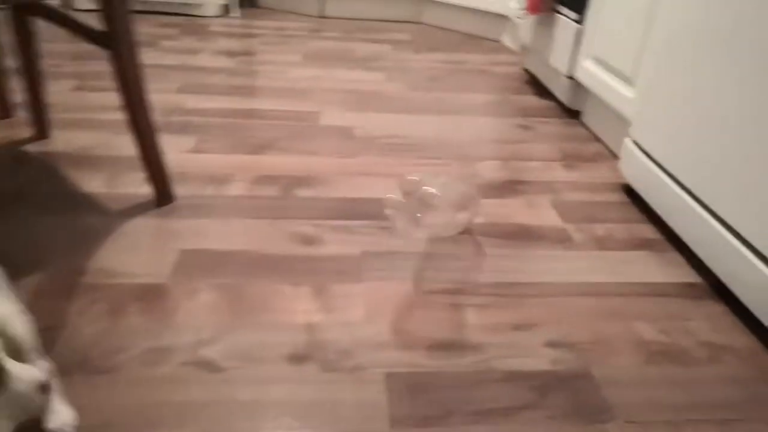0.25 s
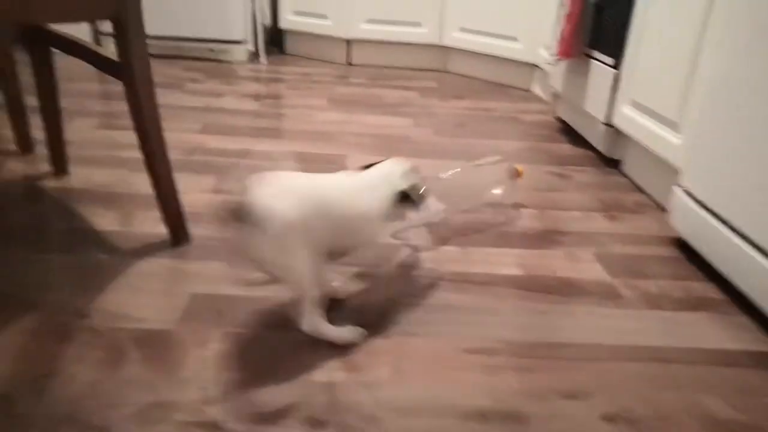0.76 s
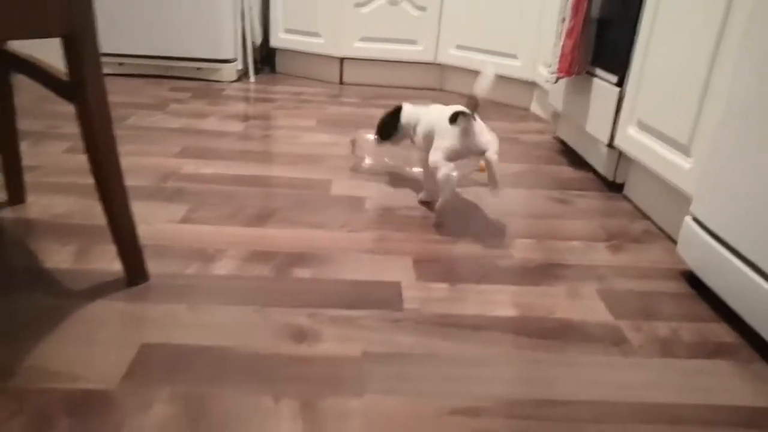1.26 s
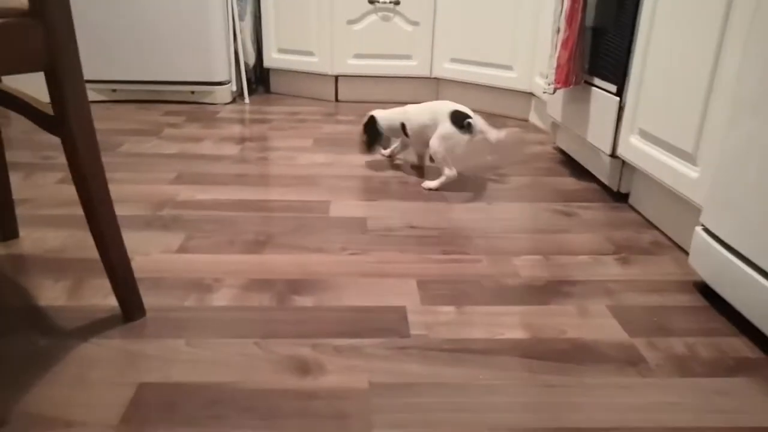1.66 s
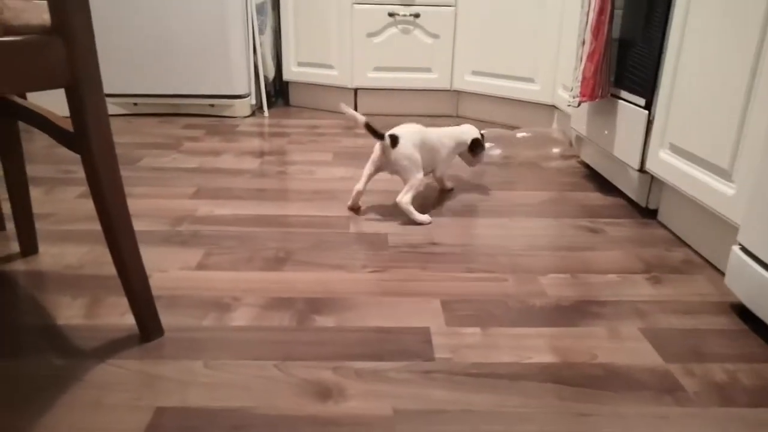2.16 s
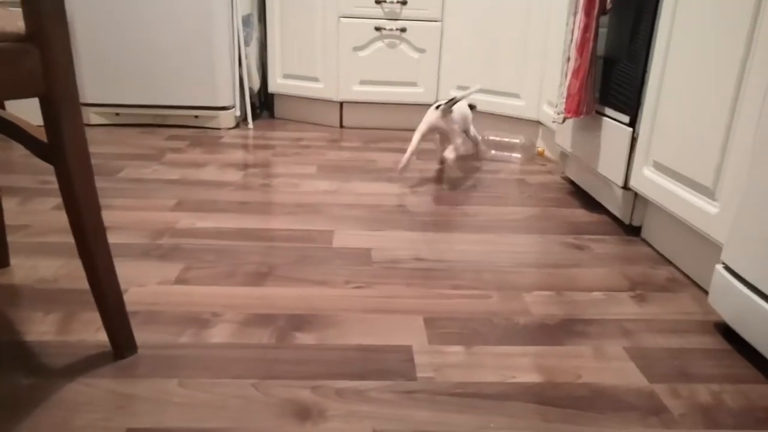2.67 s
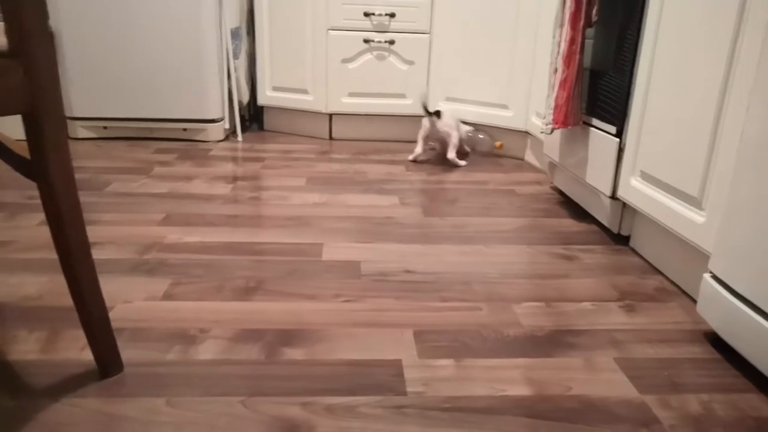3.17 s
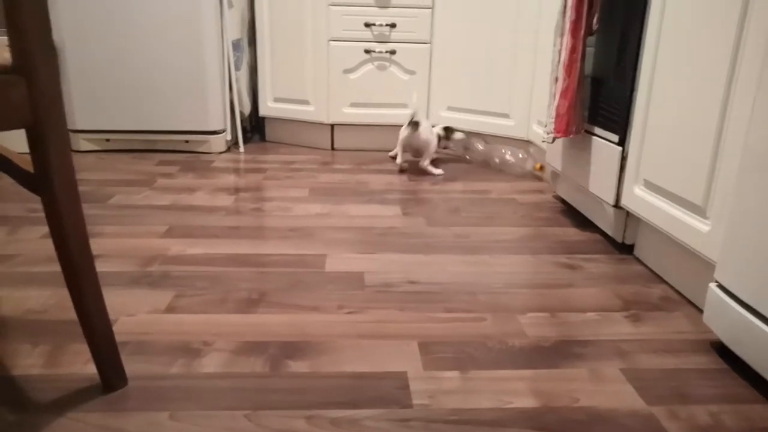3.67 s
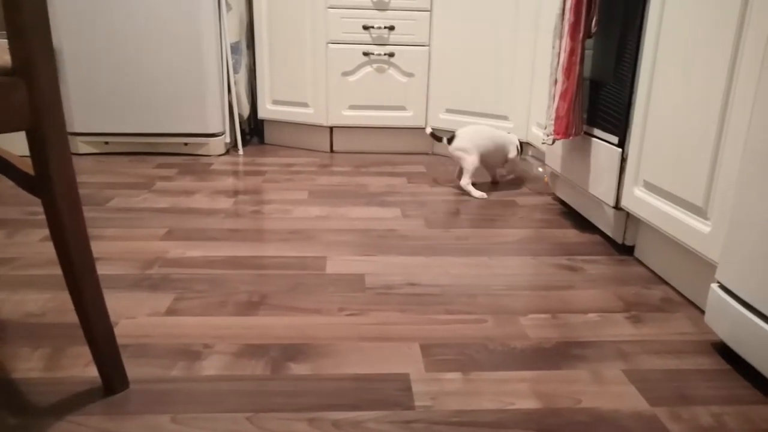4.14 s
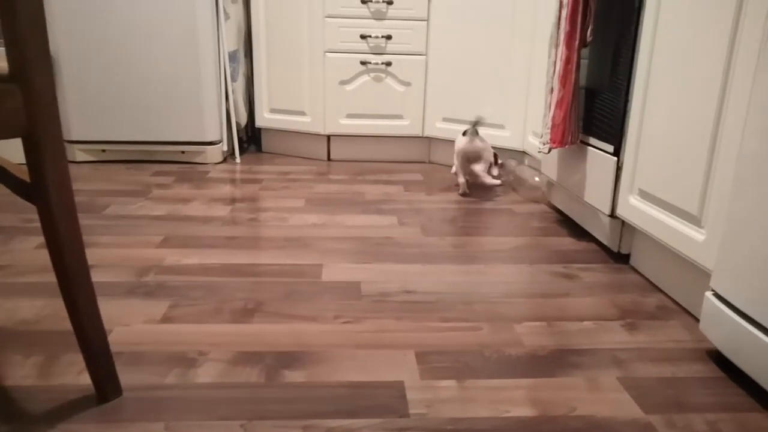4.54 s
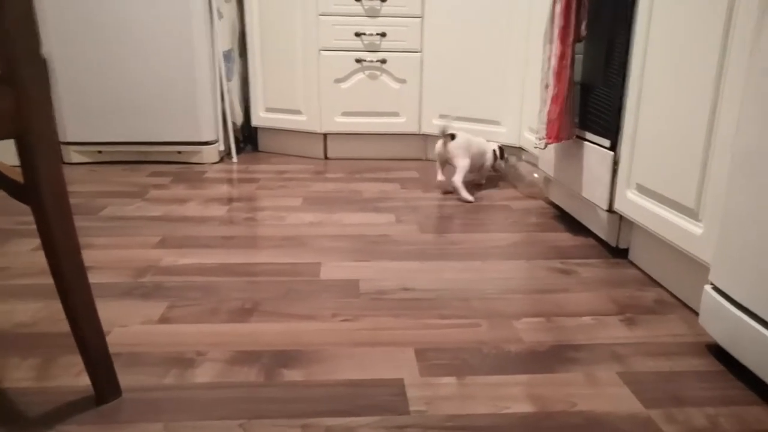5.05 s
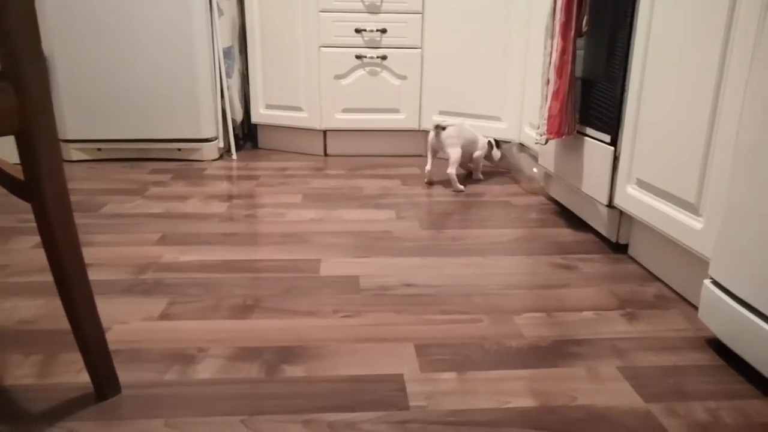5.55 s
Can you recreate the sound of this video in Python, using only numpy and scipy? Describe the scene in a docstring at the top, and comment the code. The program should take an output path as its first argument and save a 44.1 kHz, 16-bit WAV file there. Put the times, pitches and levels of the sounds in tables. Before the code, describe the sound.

Uneven crunches and snaps of a thin plastic bottle, with floor thuds and faint claw ticks as a puppy plays in an echoing kitchen.

```python
"""A puppy and a plastic bottle

A puppy bites and shoves an empty plastic bottle across the laminate floor of a bare, echoing kitchen.
Each knock or bite sets off a short run of snaps as the thin wall buckles; some leave a note ringing.
Paws and bottle thump the floorboards, and claws tick lightly on them.
The echo grows as the game moves off towards the cupboards and shrinks when it comes closer."""
import sys
import numpy as np
from scipy import signal
from scipy.fft import rfft, irfft, next_fast_len
from scipy.io import wavfile

SR = 44100
rng = np.random.default_rng(int(sys.argv[2]) if len(sys.argv) > 2 else 0)


def put_to_file(sound):
    """Save the sound as 16-bit audio at rate SR, in the file named by the first command-line argument."""
    columns = np.atleast_2d(sound).T  # one column per channel
    safe = np.clip(columns, -1, 1)
    whole_steps = np.round(safe * 32767)
    wavfile.write(sys.argv[1], SR, whole_steps.astype(np.int16))


N = 256212
TIME = np.arange(N) / SR

# tone of the room's faint background noise: (frequency [Hz], relative level [dB])
HUSH_TONE = [(30, -28), (70, -3.5), (200, -10), (400, -13.5), (800, -20.5), (2100, -21.5), (4000, -32),
             (8000, -26), (15000, -29)]
# paws and bottle landing hard on the floor: (time [s], board level [dB], deep thud level [dB])
THUMPS = [(.071, -18.5, -34), (.335, -22, -35), (.419, -20, -27.5), (.753, -23.5, -57), (.903, -24.5, -26),
          (1.072, -26.5, -25.5), (1.121, -27, -24), (1.212, -23, -27.5), (1.425, -18.5, -31),
          (2.172, -32, -34.5), (2.404, -40.5, -33), (2.503, -26, -49), (2.813, -20, -38),
          (2.911, -16.5, -23.5), (2.986, -19, -20.5), (3.129, -18.5, -20.5), (3.364, -21.5, -30.5),
          (3.48, -25, -32.5), (3.725, -18.5, -50), (3.885, -18, -25.5), (4.022, -15, -23),
          (4.375, -51, -27), (4.428, -16.5, -20.5), (4.672, -24, -25), (5.052, -31.5, -25.5),
          (5.167, -36, -32.5), (5.374, -46, -35.5), (5.495, -27, -30.5), (5.527, -17.5, -22)]
# how busily the puppy worries the bottle between knocks: (time [s], strength [dB])
FUSS = [(.06, -90), (.27, -29), (.7, -39.5), (1.05, -26), (1.62, -32.5), (1.95, -49.5), (2.09, -49.5),
        (2.16, -31), (2.53, -35), (2.65, -51.5), (3.15, -34.5), (3.3, -43.5), (3.62, -39), (3.92, -28.5),
        (4.3, -48.5), (4.62, -34.5), (4.85, -67), (5.68, -37)]
# A mode is a note that an object rings at when struck.
# hollow notes of the boards: (base pitch [Hz], width [Hz], relative level [dB])
BOARD_MODES = [(239.6, 29, 2), (320, 17.3, 0.5), (359.3, 32.6, 0), (527, 36, -6.5)]
# deep thud of the floor: (pitch [Hz], width [Hz], relative level [dB])
THUD_MODES = [(75, 18, -4), (115, 19.5, -7), (160, 31, 2)]
# the boards sound lower towards the cupboards: (time [s], pitch [ratio])
BOARD_PITCH = [(0, 1.054), (2.9, 1), (4.1, 0.967), (5.5, 0.97)]

# knocks and bites; sharpness below 0 is a blunt bump, above 0 a crease snapping:
# (time [s], strength [dB], sharpness [dB], buckling time [s])
KNOCKS = [(.073, -13.5, 4.5, 0.0019), (0.0941, -12, 9.5, .0004), (.337, -9.5, -10, .0004),
          (.419, -16, 8.5, 0.0049), (.465, -27, 5.5, 0.064), (0.752, -12, 9.5, 0.0084),
          (.906, -22.5, 2.5, 0.0051), (.928, -14, -2.5, .002), (1.124, -12.5, 6.5, .0034),
          (1.212, -17.5, 3, .006), (1.232, -19, 2, 0.021), (1.38, -30, -23, 0.0099),
          (1.429, -12.5, 0, 0.0031), (1.456, -20, 9.5, 0.021), (1.486, -9, 6, 0.0062),
          (1.52, -11, 5.5, .01), (1.566, -15.5, 19.5, 0.0034), (1.574, -9, 8, 0.0033),
          (1.733, -19, 7, 0.0062), (2.258, -41, 24, 0.016), (2.404, -33, 10, 0.02),
          (2.505, -31.5, -6, 0.02), (2.754, -16.5, -5, 0.011), (2.778, -19.5, 5, 0.0084),
          (2.814, -8, -9.5, 0.0023), (2.915, -21.5, 6, .013), (2.984, -10.5, -20, .0004),
          (3.011, -17.5, -1, 0.016), (3.109, -25.5, 2.5, 0.035), (3.359, -26, -2.5, 0.0098),
          (3.475, -30.5, -2, 0.0049), (3.666, -26, 2.5, 0.0093), (3.725, -15, -16.5, 0.00069),
          (3.885, -18.5, -9, 0.007), (3.945, -23, 4, 0.012), (4.024, -20.5, -3, 0.0075),
          (4.07, -18, -12, 0.017), (4.096, -18, -2, 0.0073), (4.376, -25.5, 0.5, 0.1),
          (4.428, -10, -4, 0.0065), (4.448, -16.5, -1, 0.0074), (4.67, -17, 0.5, 0.014),
          (5.035, -29, -23.5, 0.017), (5.054, -25.5, 4.5, 0.011), (5.373, -41.5, -3, 0.015),
          (5.527, -18, -8, 0.016), (5.565, -15, 1.5, 0.0025)]
# the bottle's soft panels: (pitch [Hz], width [Hz], relative level [dB])
PANEL_MODES = [(525, 203, -8.5), (783, 374, -6.5), (943, 96, -3.5), (1151, 93, 1), (1287, 284, -4),
               (1595, 121, 1), (1630, 1110, -16)]
# its stiff ribbed wall: (pitch [Hz], width [Hz], relative level [dB])
WALL_MODES = [(1780, 152, -3), (2014, 209, 2), (2340, 300, -3), (2758, 350, -3.5), (2762, 430, -13.5)]
# its sharp creases: (pitch [Hz], width [Hz], relative level [dB])
CREASE_MODES = [(3460, 860, 0.5), (4674, 400, 5), (5450, 930, 6), (7350, 990, 1)]
# the fine, high fizz of a snap: (pitch [Hz], width [Hz], relative level [dB])
FIZZ_MODES = [(7900, 5100, -24.5), (9730, 4600, 7), (12500, 970, -8.5)]
# how the fizz comes and goes: (time [s], gain [dB])
FIZZ_GAIN = [(0, -32.5), (.6, -22.5), (1.6, -28.5), (2.3, -26.5), (2.9, -28), (3.6, -23), (4.05, -30),
             (4.7, -22.5), (5.6, -36)]
# notes left ringing in the bottle or floor: (time [s], pitch [Hz], level [dB], time to fade 60 dB [s])
RINGING_NOTES = [(.094, 2144, -15, 0.55), (.338, 1984, -17.5, 0.26), (.927, 1194, -17.5, 0.29),
                 (1.12, 110, -24, 0.44), (1.52, 560, -23, 0.086), (1.734, 288, -28, 1),
                 (2.408, 238, -24.5, 0.38), (2.814, 1130, -21, 0.44), (2.813, 314, -13.5, 0.24),
                 (3.01, 1158, -20.5, 0.41), (3.726, 1147, -15.5, 0.15), (4.024, 10000, -32.5, 0.1),
                 (4.43, 1200, -29, .22), (4.429, 523, -21, 0.11), (5.53, 490, -27, .3),
                 (5.55, 74.5, -28.5, 1)]
# a claw ticking on laminate: (pitch [Hz], width [Hz], relative level [dB])
CLAW_MODES = [(1250, 500, -2.5), (2200, 390, 8), (5000, 7600, -14.5)]

# how long the kitchen echoes: (frequency [Hz], time to fade 60 dB [s])
ECHO_FADE = [(70, 0.4), (160, 0.44), (290, 0.39), (600, 0.49), (1200, 0.45), (2200, 0.52), (5500, 0.54),
             (12000, 0.36)]
# more echo means farther away: (time [s], base level of echo over direct sound [dB])
ECHO_AMOUNT = [(0, 2.5), (.4, 4), (.8, 0), (1.5, 3), (2.8, 4.5), (3.7, 4.5), (4.5, 0), (5.8, 4.5)]
# how alike the room sounds left and right: (frequency [Hz], correlation [-1 to 1])
LIKENESS = [(60, 0.98), (140, 1), (280, 0.8), (500, -0.32), (1100, 0.23), (2500, -0.14), (10000, 0.29)]
# tone of the left microphone: (frequency [Hz], gain [dB])
LEFT_MIC = [(150, -1), (500, -4), (1100, 1.1), (2200, -6.5), (4200, 0), (6400, -10), (9500, -2.5),
            (12000, -13), (15000, -9.5)]
# tone of the right microphone: (frequency [Hz], gain [dB])
RIGHT_MIC = [(150, -1), (500, -1), (1100, 4), (2200, 0.26), (4200, 2.76), (6400, -10), (7400, -13.5),
             (8400, -23), (15000, -19)]

DIRECTIONS = 5   # each sound heads for the walls along this many paths


def from_db(db):
    """Turns decibels into a number to multiply by."""
    return 10 ** (np.asarray(db) / 20)


def unit_energy(x):
    """Scales a sound so that its energy is 1."""
    return x / np.sqrt(np.sum(x ** 2) + 1e-20)


def at_time(points, s):
    """Reads a table at time s, sliding between its rows."""
    return np.interp(s, *np.transpose(points))


def at_hz(points, hz):
    """Reads a table at a frequency, with octaves evenly spaced."""
    return np.interp(np.log(hz + 1), np.log(np.array(points)[:, 0]), np.array(points)[:, 1])


def add(track, s, sound, aim_db=0):
    """Lays a sound in at time s: row 0 heads straight for the microphones, the others for the walls."""
    start = max(round(s * SR), 0)
    paths = np.vstack([from_db(aim_db) * sound.sum(axis=0), sound])
    track[:, start:start + paths.shape[1]] += paths[:, :max(N - start, 0)]


def surrounding_noise(size):
    """Spectrum and frequencies of noise from all sides: left and right are alike only in the bass."""
    hz = np.fft.rfftfreq(size, 1 / SR)
    alike = np.clip(at_hz(LIKENESS, hz), -1, 1)
    mid, side = rfft(rng.standard_normal((2, size)))
    return np.sqrt(1 + alike) * mid + np.sqrt(1 - alike) * side * [[1], [-1]], hz


def room_hush(level_db):
    """Faint, steady noise fills the room."""
    spectrum, hz = surrounding_noise(N)
    noise = irfft(spectrum * from_db(at_hz(HUSH_TONE, hz)), N)
    return from_db(level_db) * np.sqrt(2 * N) * unit_energy(noise)


def fussing(count):
    """The puppy makes small contacts at uneven moments: rows of (time [s], strength [dB])."""
    times = (np.arange(count) + rng.random(count)) / count * N / SR
    return np.transpose([times, at_time(FUSS, times)])


def snaps(fade_s, per_s, uneven_db, size, first_db=0):
    """A first snap, then a dying run of uneven ones; one row for each direction."""
    t = np.arange(size) / SR
    happens = rng.random((DIRECTIONS, size)) < per_s / DIRECTIONS / SR
    strength = from_db(uneven_db * np.clip(rng.standard_normal((DIRECTIONS, size)), -2, 1.6))
    run = happens * rng.choice([-1, 1], size) * strength
    run[rng.integers(DIRECTIONS), 0] = from_db(1.18 * uneven_db + first_db)
    return run * np.exp(-t / (2 * max(fade_s, 5e-4)))


def ring(drive, modes, level_db, detune):
    """A blow makes an object's modes ring; their balance varies by chance, and detune varies pitch."""
    out = 0
    chances = rng.standard_normal((len(modes), 2))
    for k, ((hz, width, db), (pitch_chance, level_chance)) in enumerate(zip(modes, chances)):
        decay = np.exp(-np.pi * width / SR)
        angle = 2 * np.pi * hz * np.exp(detune * pitch_chance) / SR
        feedback = [1, -2 * decay * np.cos(angle), decay ** 2]
        note = signal.lfilter([1 - decay ** 2, 0, decay ** 2 - 1], feedback, drive + 1e-18)
        out = out + (-1) ** k * from_db(db + 2.51 * level_chance) * note
    return from_db(level_db) * unit_energy(out) * np.sqrt(SR / 100)   # level as if spread over 10 ms


def floor_thumps():
    """Blows and light steps on a floating floor: a hollow board note over a deep thud."""
    out = np.zeros((1 + DIRECTIONS, N))
    light_steps = [(s, db + 3.5, db - 14.5) for s, db in fussing(count=28)]
    for s, board_db, thud_db in THUMPS + light_steps:
        run = snaps(fade_s=0.015, per_s=400, uneven_db=4, size=6144)
        board_modes = np.array(BOARD_MODES) * [at_time(BOARD_PITCH, s), 1, 1]
        add(out, s, ring(run, board_modes, board_db, detune=0.019))
        add(out, s, ring(run, THUD_MODES, thud_db, detune=0.076))
    return signal.sosfilt(signal.butter(2, 800, fs=SR, output="sos"), out + 1e-18)


def buckle(s, strength_db, sharp_db, fade_s, size, aim_db=0):
    """One run of snaps shakes panels, wall and creases; a sharper blow favours the creases and fizz."""
    run = snaps(fade_s, per_s=800, uneven_db=6, size=size, first_db=aim_db - 0.5)
    jaws_db = -7 if 1.47 < s < 1.65 else 0   # clamped in the jaws, the soft panels are muffled
    panel_db = strength_db - 5.5 - 0.33 * sharp_db + jaws_db
    wall_db = strength_db - 2 + 0.076 * sharp_db
    crease_db = strength_db - 11.5 + 0.82 * sharp_db
    fizz_db = 0.78 * strength_db + at_time(FIZZ_GAIN, s) + 0.95 * sharp_db   # light scrapes keep more
    return (ring(run, PANEL_MODES, panel_db, detune=0.041)
            + ring(run, WALL_MODES, wall_db, detune=0.038)
            + ring(run, CREASE_MODES, crease_db, detune=0.046)
            + ring(run, FIZZ_MODES, fizz_db, detune=0.022))


def bottle_crunches(square_hit_s):
    """The thin wall buckles under every knock or bite and crinkles faintly in between."""
    out = np.zeros((1 + DIRECTIONS, N))
    for s, strength_db, sharp_db, fade_s in KNOCKS:
        # A blow briefer than square_hit_s lands squarely: its first snap stands out,
        # and more of it goes to the microphones and less to the walls.
        aim_db = 5.5 * np.log10(square_hit_s / max(fade_s, 5e-4))
        crunch = buckle(s, strength_db - 0.65 * aim_db, sharp_db, fade_s, size=6144, aim_db=aim_db)
        add(out, s, crunch, aim_db)
    for s, strength_db in fussing(count=58):
        add(out, s, buckle(s, strength_db, sharp_db=6.5, fade_s=0.019, size=2048))
    return out


def ringing_notes(width_share, size):
    """After some blows one note rings on, wavering as the bottle rocks and turns."""
    out = np.zeros((1 + DIRECTIONS, N))
    t = np.arange(size) / SR
    for s, hz, db, fade_s in RINGING_NOTES:
        rocking = rng.standard_normal((DIRECTIONS, size)) * from_db(-60 * t / fade_s)
        add(out, s, ring(rocking, [(hz, width_share * hz, 0)], db, detune=0))
    return out


def claw_ticks(count):
    """Claws tick lightly on the laminate while the puppy runs about."""
    out = np.zeros((1 + DIRECTIONS, N))
    for s, level_db in rng.uniform([0.5, -53], [4.3, -44], (count, 2)):
        run = snaps(fade_s=0.0018, per_s=730, uneven_db=-3, size=2048)
        add(out, s, ring(run, CLAW_MODES, level_db, detune=0.043))
    return out


def wall_echo(build_s, early_db, early_s):
    """The room's answer to a click: a few early echoes thicken into a tail that fades band by band."""
    spectrum, hz = surrounding_noise(SR)
    t = TIME[:SR]
    bands_hz = np.geomspace(60, 15000, 14)
    band_position = np.interp(np.log(hz + 1), np.log(bands_hz), np.arange(len(bands_hz)))
    tail = 0
    for k, centre_hz in enumerate(bands_hz):
        band = irfft(spectrum * np.maximum(1 - abs(band_position - k), 0), SR)
        tail = tail + band * from_db(-60 * t / at_hz(ECHO_FADE, centre_hz))
    tail = unit_energy(tail * (1 - np.exp(-t / build_s)))
    arrives = (rng.random((2, SR)) < 400 / SR) & (t > 0.001)   # about 400 echoes a second
    early = arrives * rng.standard_normal((2, SR)) * np.exp(-t / early_s)
    early = signal.sosfilt(signal.butter(1, 500, "high", fs=SR, output="sos"), early)
    return np.sqrt(2) * unit_energy(tail + from_db(early_db) * unit_energy(early))


def kitchen(paths, walls, extra_echo_db):
    """Each direction meets different walls; the farther off the game, the more echo is heard."""
    echo_gain = from_db(at_time(ECHO_AMOUNT, TIME) + extra_echo_db)
    paths = paths / np.sqrt(1 + echo_gain ** 2)   # the direct sound drops as the echo grows
    size = next_fast_len(N + SR)
    to_walls = rfft(paths[1:] * echo_gain, size)[:, None]
    echo = irfft((to_walls * rfft(walls, size)).sum(axis=0), size)[:, :N]
    right = paths[0]
    left = np.interp(TIME - 4e-5, TIME, right)   # the left microphone hears it a moment later
    return np.array([left, right]) + echo


def microphone(x, tone):
    """A microphone picks up some frequencies more strongly than others."""
    size = next_fast_len(N + 2048)
    gain = from_db(at_hz(tone, np.fft.rfftfreq(size, 1 / SR)))
    return irfft(rfft(x, size) * gain, size)[:N]


def scene():
    """Floor, bottle and claws all sound in the same kitchen."""
    walls = np.array([wall_echo(build_s=0.0041, early_db=-4.5, early_s=0.0056)
                      for _ in range(DIRECTIONS)])
    clatter = bottle_crunches(square_hit_s=0.0033)
    clatter += ringing_notes(width_share=0.059, size=24000)
    clatter += claw_ticks(count=36)
    return (kitchen(floor_thumps(), walls, extra_echo_db=0)
            + kitchen(clatter, walls, extra_echo_db=1.8)
            + room_hush(level_db=-59))


def record(dry):
    """Two microphones colour the sound; the tallest peaks are rounded and the highest treble is cut."""
    heard = np.array([microphone(dry[0], LEFT_MIC), microphone(dry[1], RIGHT_MIC)])
    rounded = 1.6 * np.tanh(heard / 1.6)
    treble_cut = signal.ellip(10, 0.1, 80, 15600, fs=SR, output="sos")
    return signal.sosfilt(treble_cut, rounded)


dry = scene()
out = record(dry)
put_to_file(out)
```